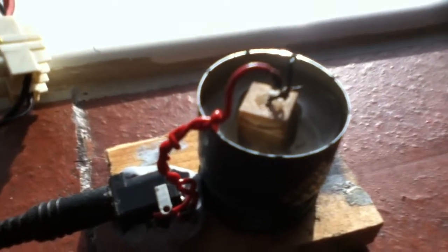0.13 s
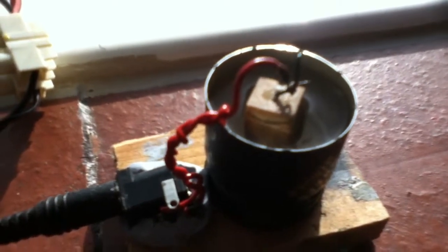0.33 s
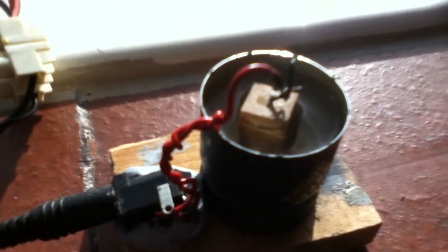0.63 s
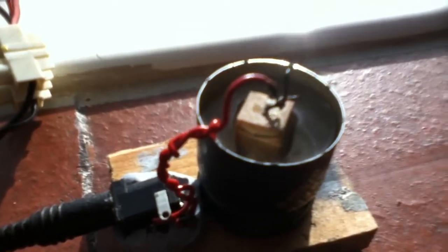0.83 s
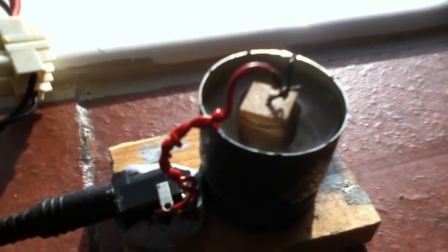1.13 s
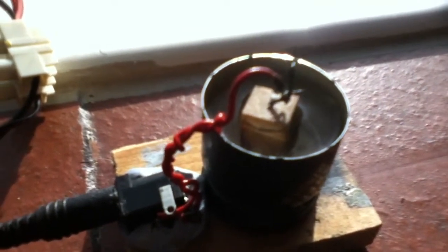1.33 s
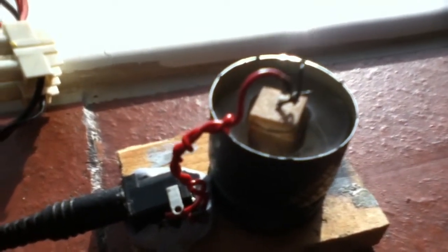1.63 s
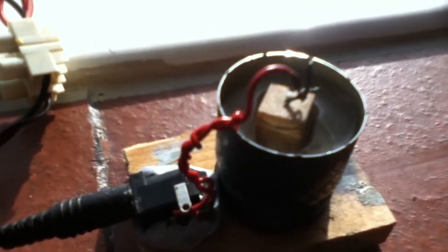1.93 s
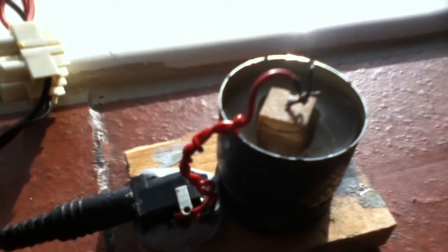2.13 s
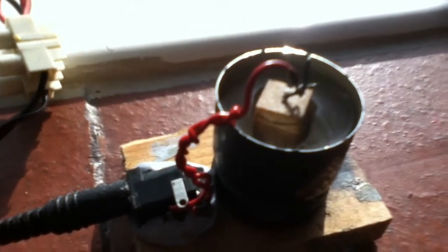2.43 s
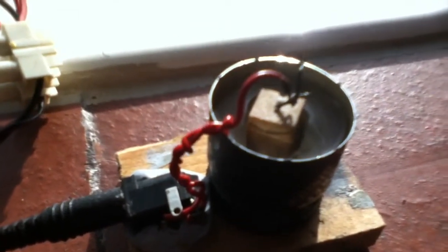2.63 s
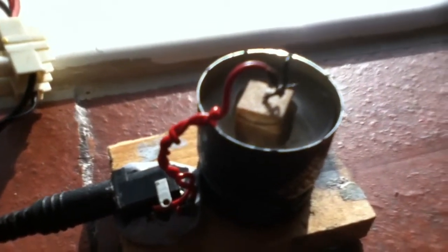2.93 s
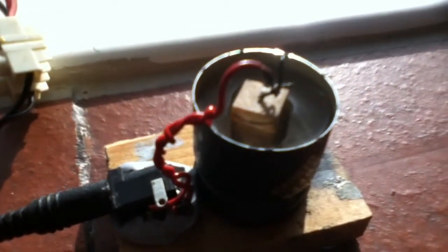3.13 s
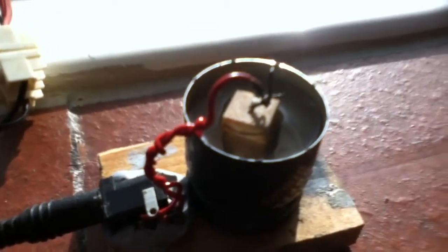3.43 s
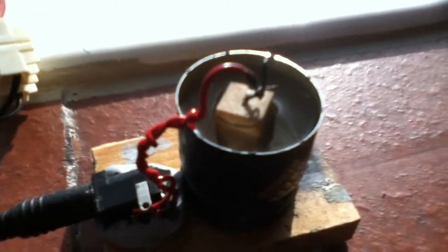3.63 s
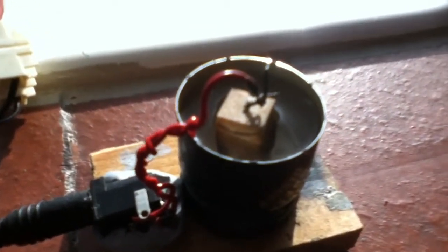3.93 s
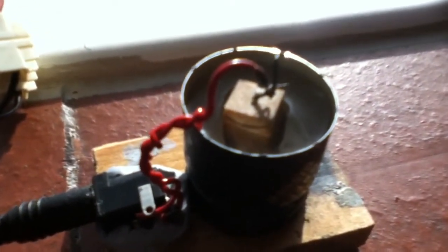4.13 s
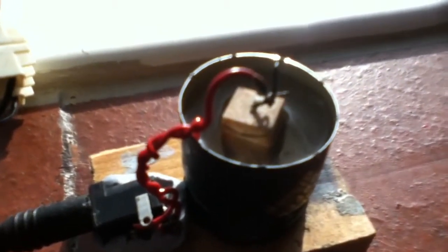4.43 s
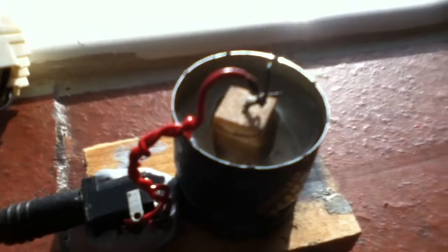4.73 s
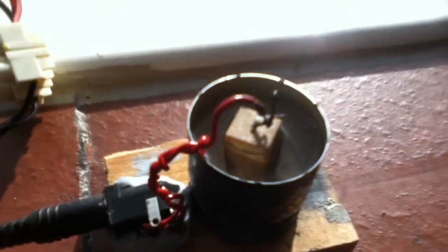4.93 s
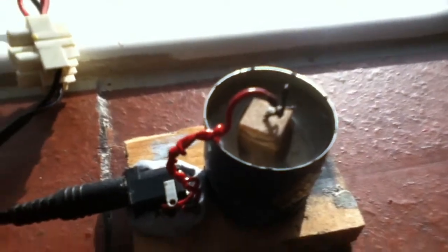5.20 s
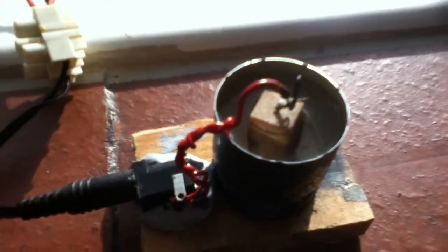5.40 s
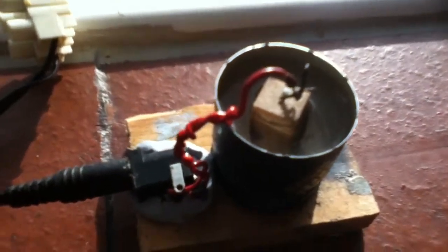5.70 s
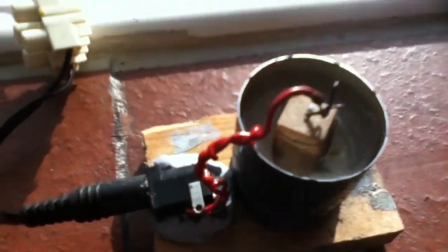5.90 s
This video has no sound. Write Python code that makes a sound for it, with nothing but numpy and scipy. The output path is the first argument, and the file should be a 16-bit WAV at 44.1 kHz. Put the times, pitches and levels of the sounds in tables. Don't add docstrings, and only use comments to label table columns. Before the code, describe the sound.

A dense, bright hiss of water fizzing hard in a small metal can, with faint wandering whistles and tiny high steam squeaks, close indoors.

```python
import sys
import numpy as np
from scipy import signal
from scipy.fft import dct
from scipy.io import wavfile
from scipy.ndimage import uniform_filter1d

SR = 44100
rng = np.random.default_rng(int(sys.argv[2]) if len(sys.argv) > 2 else 0)


def convert_level_to_amplitude(level_db):
    exponent = np.asarray(level_db, float) / 20
    return 10 ** exponent


def wrap_up_sound(samples):
    columns = np.atleast_2d(samples).T
    tamed = np.clip(columns, -1, 1)
    steps = np.round(tamed * 32767).astype(np.int16)
    wavfile.write(sys.argv[1], SR, steps)


N = 267201

# time in seconds, level in dB.
BOIL_LEVEL = [(0.0, -40), (0.55, -40), (1.25, -43), (1.8, -41.5), (2.45, -43), (2.75, -41.5), (3.95, -42.5),
              (4.6, -41), (5.2, -42), (5.6, -41.5), (6.06, -40.5)]
# time in seconds, share of near view from 0 to 1, share of side view from 0 to 1.
CAMERA_VIEW = [
    (0, 1, 0.07),
    (.6, 0.83, 0),
    (.9, 0.7, 0.1),
    (1.2, 0.07, 0.02),
    (3, 0, 0.07),
    (4.2, 0.04, 0.48),
    (5, 0.23, 0.54),
    (5.3, 0, 0.66),
    (6.06, 0, 0.8),
]
# frequency in Hz, level in dB.
FIZZ_COLOUR = [(300, -35), (600, -24), (1000, -20.5), (2200, -17.5), (3400, -13), (3620, -6), (7200, -2.5),
               (8800, -9.5), (12300, -6), (12750, -19.5), (13000, -30), (14800, -31), (15200, -33),
               (16000, -34)]
# centre in Hz, width in Hz, then the lift in dB as heard
CAN_RESONANCES = [(1355, 290, 3, 1, 4), (1833, 340, -2.5, 5, 6), (1941, 240, 1.5, -7, -5.5),
                  (2314, 170, -5, -6, -8), (2630, 590, 2, -0.5, 3.5), (4110, 720, 2, 4.5, 2.5),
                  (4750, 120, -3.5, -4.5, -6.5), (4935, 320, 2.5, 4.5, -3), (5810, 590, -4.5, -1.5, -0.5),
                  (6180, 410, 2.5, 0.5, 1), (6480, 320, 1, 1, -1.5), (7070, 460, -2.5, -1.5, 3),
                  (7470, 290, -5, -3.5, -5), (8160, 410, 5.5, 0.5, 1.5), (9320, 360, 4.5, 0.5, 3),
                  (10060, 400, 1, 3.5, 3), (11300, 250, -9, 5, 1.5), (12100, 330, -4, 5, -8),
                  (14200, 900, 6, 3.5, 1), (13180, 120, 2, 4, 3), (15000, 300, 5, 0, -3.5)]
# middle in seconds, length in seconds, centre in Hz, width in Hz, change in dB.
FIZZ_CHANGES = [
    (2.54, 0.089, 7000, 3500, -3.5),
    (3.75, 0.11, 5800, 1700, -1.5),
    (0.39, 0.046, 4000, 8700, -1),
    (5.7, .6, 4200, 600, 1.5),
    (5.35, .4, 800, 600, 2.5),
    (4, .4, 3000, 900, -2),
]
# time in seconds, pitch in Hz, level in dB.
COLUMN_WHISTLE = [(0.3, 5010, -59), (0.9, 5057, -52), (1.3, 5200, -55.5), (1.7, 5030, -53.5),
                  (1.95, 4980, -52), (2.25, 5120, -53), (2.45, 4940, -51.5), (2.78, 5100, -49.5),
                  (3.1, 4900, -54.5), (3.5, 5040, -52), (3.75, 4963, -50.5), (4.05, 5050, -50.5),
                  (4.3, 4960, -49), (4.6, 5040, -50.5), (4.95, 4960, -51), (5.05, 4940, -59),
                  (5.8, 4990, -54)]
# start in seconds, length in seconds, start pitch in Hz, end pitch in Hz, level in dB.
HIGH_WHISTLES = [
    (0.651, 2.3, 9730, 10160, -60),
    (0.999, 1.6, 10920, 11370, -59),
    (2.7, .75, 11700, 11700, -53.5),
    (3.348, 0.86, 11740, 11840, -50.5),
    (4.08, 1.04, 10920, 11230, -54),
]
# start in seconds, length in seconds, start pitch in Hz, end pitch in Hz, level in dB.
STEAM_SQUEAKS = [
    (1.563, .045, 12200, 10950, -50),
    (1.692, .025, 12500, 11500, -47),
    (1.77, .04, 11400, 11300, -57),
    (1.818, .05, 12300, 11200, -47),
    (2.39, 0.075, 12400, 11750, -50),
    (2.96, 0.045, 11900, 12100, -50),
    (5.038, 0.036, 12150, 11740, -50),
    (5.43, 0.19, 12700, 12050, -58),
    (5.817, .14, 12400, 12300, -53),
]
# frequency in Hz, level in dB per Hz.
ROOM_COLOUR = [(12, -58), (20, -45), (44, -7), (125, -1), (172, 0.5), (198, -4.5), (222, 2), (260, -5.5),
               (454, -7), (585, -11.5), (900, -19.5), (1170, -46), (1980, -120)]
# start in seconds, length in seconds, pitch in Hz, width in Hz, level in dB.
BUILDING_THUDS = [(0, 0.054, 121, 101, -64), (0.454, 0.25, 447, 80, -68), (.65, 0.13, 171, 120, -62),
                  (1.701, 0.19, 450, 120, -64.5), (1.78, .12, 203, 119, -60), (4.64, 0.064, 166, 40, -57.5),
                  (4.74, .12, 179.7, 130, -55.5), (4.78, 0.11, 123, 30, -60.5),
                  (5.12, 0.25, 182.6, 130, -65), (5.271, .08, 433, 77.5, -58.5),
                  (5.48, 0.16, 452, 110, -65.5)]
# pitch in Hz, level in dB.
ELECTRONIC_WHINE = (14994, -84)

POPS_PER_S = 2500
WALL_NEAR_DB, WALL_SIDE_DB = 2, .6
WAVER_HZ, THROB_DB, WAVERS_PER_S = 35, 1.2, 14
SWOOP_S, SWOOP_HZ, SWOOP_DB, SWOOP_REACH_S = 5.26, 11700, -47.5, .145
DIVE_HZ_PER_S, CLIMB_HZ_PER_S, SWOOP_FADE_DB = 9500, 8000, -17
RUMBLE_DB = -61.5


def fizz(pops_db=-13, spread_db=4.5, patchy_db=0.46, streak_db=2.05, flicker_db=0.14):
    pop_here = rng.random(N) < POPS_PER_S / SR
    pops = convert_level_to_amplitude(spread_db * np.minimum(rng.exponential(1, N), 5)) * pop_here
    bursts = rng.standard_normal(N) + convert_level_to_amplitude(pops_db) * evened(pops * rng.choice([-1, 1], N))
    hz, t, z = signal.stft(bursts, SR, nperseg=1024, noverlap=768)
    level_db, = columns(BOIL_LEVEL, t)
    near, side = np.clip(columns(CAMERA_VIEW, t), 0, 1)
    above = np.clip(1 - near - side, 0, 1)
    centre, width, *lifts = np.transpose(CAN_RESONANCES)
    can_db = bell(hz[:, None], centre, width) @ np.transpose(lifts) @ np.array([near, above, side])
    colour_db = read(FIZZ_COLOUR, hz)[:, None] + can_db
    colour_db -= 10 * np.log10(np.mean(convert_level_to_amplitude(colour_db) ** 2, axis=0))
    wall_share = 1 / (1 + (hz / 3200) ** 12)
    colour_db += np.outer(wall_share, WALL_NEAR_DB * near + WALL_SIDE_DB * side - .6)
    for s, length, middle_hz, width_hz, db in FIZZ_CHANGES:
        colour_db += db * np.outer(bell(hz, middle_hz, width_hz), bell(t, s, length))
    chance, slow = rng.standard_normal((2, len(t), len(hz)))
    patches = uniform_filter1d(uniform_filter1d(chance, size=14, axis=0), size=10, axis=1)
    streaks = uniform_filter1d(uniform_filter1d(slow, size=40, axis=0), size=25, axis=0)
    flicker = evened(uniform_filter1d(chance[:, 0], size=8)) * np.clip(hz / 9000, 0, 1.5)[:, None]
    texture_db = patchy_db * evened(patches).T + streak_db * evened(streaks).T + flicker_db * flicker
    z = z * convert_level_to_amplitude(colour_db + level_db + texture_db)
    return signal.istft(z, SR, nperseg=1024, noverlap=768)[1][:N]


def whistles():
    out = np.zeros(N)
    add(out, *whistle(COLUMN_WHISTLE, width_hz=190))
    for s, length, start_hz, end_hz, level_db in HIGH_WHISTLES:
        course = [(s, start_hz, level_db), (s + length, end_hz, level_db)]
        add(out, *whistle(course, width_hz=220))
    for s, length, start_hz, end_hz, level_db in STEAM_SQUEAKS:
        hz = np.linspace(start_hz, end_hz, round(length * SR))
        squeak = fuzzy_tone(hz, 350) * signal.windows.tukey(len(hz), .5)
        add(out, s, convert_level_to_amplitude(level_db) * squeak)
    t = np.arange(-SWOOP_REACH_S, SWOOP_REACH_S, 1 / SR)
    hz = SWOOP_HZ + np.maximum(-DIVE_HZ_PER_S * t, CLIMB_HZ_PER_S * t)
    swoop_db = SWOOP_DB + SWOOP_FADE_DB * abs(t) / SWOOP_REACH_S
    add(out, SWOOP_S + t[0], convert_level_to_amplitude(swoop_db) * fuzzy_tone(hz, width_hz=210))
    return out


def whistle(rows, width_hz):
    hz, level_db = columns(rows, np.arange(rows[0][0], rows[-1][0], 1 / SR))
    hz = hz + WAVER_HZ * drift(len(hz), WAVERS_PER_S)
    level_db = level_db + THROB_DB * drift(len(hz), WAVERS_PER_S)
    sound = convert_level_to_amplitude(level_db) * fuzzy_tone(hz, width_hz) * signal.windows.tukey(len(hz), .15)
    return rows[0][0], sound


def rumble():
    hz, t, z = signal.stft(rng.standard_normal(N), SR, nperseg=2048, noverlap=1536)
    z = z * evened(convert_level_to_amplitude(read(ROOM_COLOUR, hz)))[:, None]
    out = signal.istft(z, SR, nperseg=2048, noverlap=1536)[1][:N] * convert_level_to_amplitude(RUMBLE_DB)
    for s, length, thud_hz, width_hz, level_db in BUILDING_THUDS:
        count = round(length * SR)
        thud = fuzzy_tone(np.full(count, thud_hz), width_hz) * np.hanning(count)
        add(out, s, convert_level_to_amplitude(level_db) * thud)
    return out


def whine():
    hz, level_db = ELECTRONIC_WHINE
    return convert_level_to_amplitude(level_db) * np.sin(2 * np.pi * hz * np.arange(N) / SR)


def fuzzy_tone(hz, width_hz):
    band = np.array([1, 1j]) @ rng.standard_normal((2, len(hz) + 2000))
    lowpass = signal.butter(2, width_hz / 2, fs=SR, output="sos")
    band = signal.sosfilt(lowpass, band)[2000:]
    return evened((band * np.exp(2j * np.pi * np.cumsum(hz) / SR)).real)


def drift(count, per_s):
    t = np.arange(count) / SR
    total = np.zeros(count)
    for f in np.geomspace(per_s / 8, per_s, 12):
        total += np.sin(2 * np.pi * (f * t + rng.random())) / np.sqrt(f)
    return evened(total)


def bell(x, centre, width):
    return np.exp(-4 * np.log(2) * ((x - centre) / width) ** 2)


def evened(x):
    return x / np.sqrt(np.mean(x ** 2) + 1e-20)


def read(points, hz):
    f, value = np.transpose(points)
    return np.interp(np.log(hz + 1), np.log(f + 1), value)


def columns(rows, t):
    s, *values = np.transpose(rows)
    return [np.interp(t, s, v) for v in values]


def add(mix, s, sound):
    part = mix[round(s * SR):][:len(sound)]
    part += sound[:len(part)]


def scene():
    mono = fizz() + whistles() + rumble() + whine()
    return np.array([mono, mono])


def thin_out(x, window, start, step_db):
    padded = np.pad(x, (2048 - start, 3072))
    frames = np.lib.stride_tricks.sliding_window_view(padded, 2048)[::1024] * window
    a, b, c, d = np.split(frames, 4, axis=1)
    folded = np.hstack([-c[:, ::-1] - d, a - b[:, ::-1]])
    scaled = dct(folded, type=4, norm="ortho") / convert_level_to_amplitude(step_db)
    rounded = np.sign(scaled) * np.floor(abs(scaled) ** .75 + .4054) ** (4 / 3)
    u, v = np.split(dct(rounded * convert_level_to_amplitude(step_db), type=4, norm="ortho"), 2, axis=1)
    unfolded = np.hstack([v, -v[:, ::-1], -u[:, ::-1], -u]) * window
    first, second = np.split(unfolded, 2, axis=1)
    return (first[1:] + second[:-1]).ravel()[1024 - start:][:N]


def low_pass(x):
    return signal.sosfilt(signal.butter(12, 15650, fs=SR, output="sos"), x)


def record(dry):
    hz = (np.arange(1024) + .5) * SR / 2048
    sine = np.sin(np.pi * (np.arange(2048) + .5) / 2048)
    smooth = signal.windows.kaiser_bessel_derived(2048, 4 * np.pi)
    first_db = read([(300, -68), (3000, -62), (4000, -52), (11000, -52), (13000, -48.5)], hz)
    second_db = read([(300, -64), (3000, -60), (4500, -54), (9000, -58), (13000, -58)], hz)
    first = thin_out(dry[0], sine, 490, first_db)
    second = thin_out(first, smooth, 1000, second_db)
    return low_pass(np.array([second, second]))


dry = scene()
out = record(dry)
wrap_up_sound(out)
```